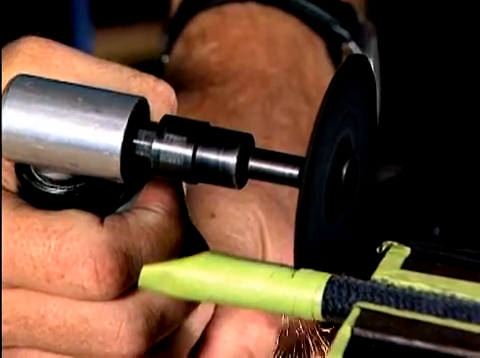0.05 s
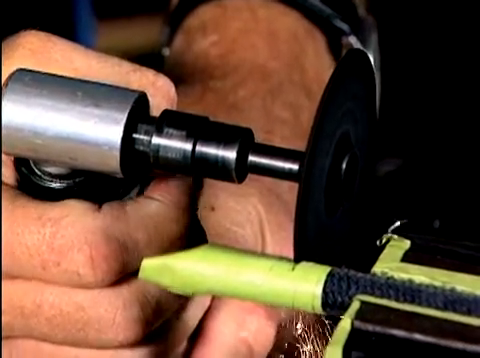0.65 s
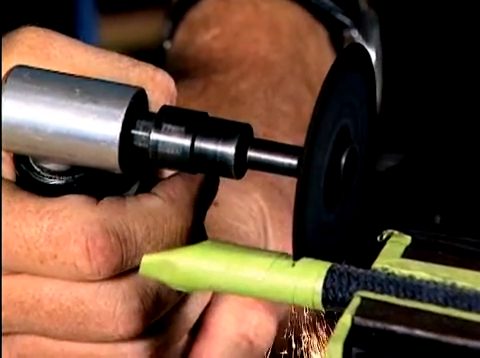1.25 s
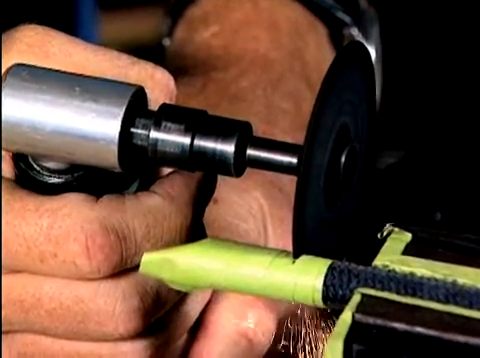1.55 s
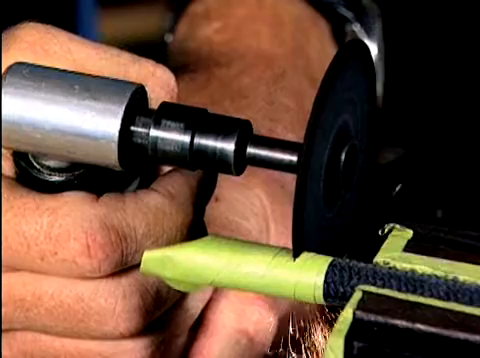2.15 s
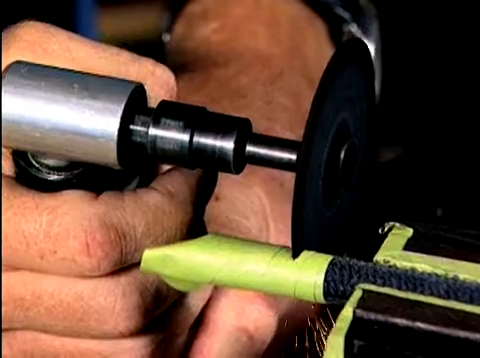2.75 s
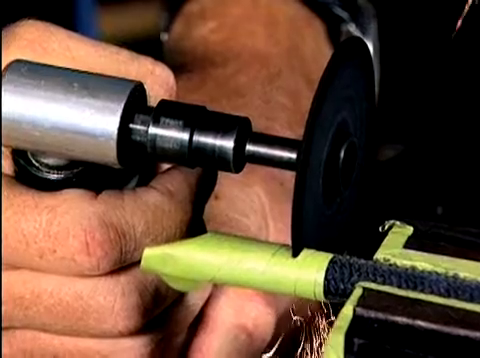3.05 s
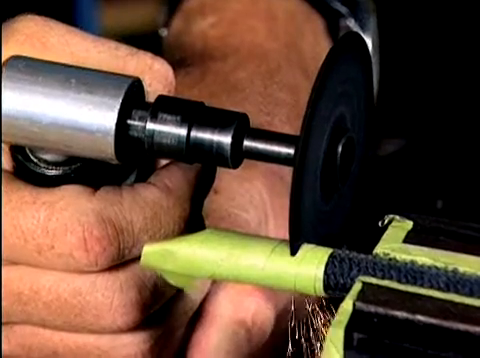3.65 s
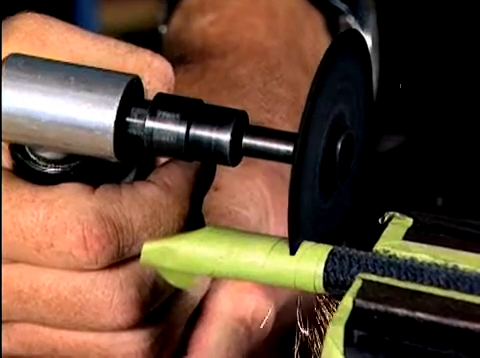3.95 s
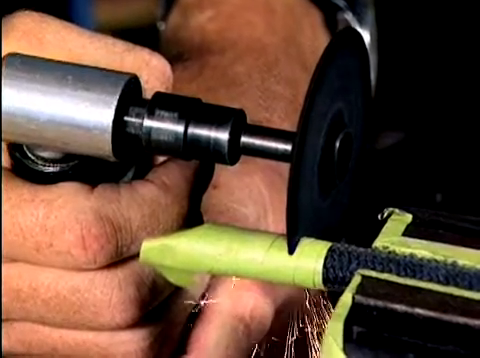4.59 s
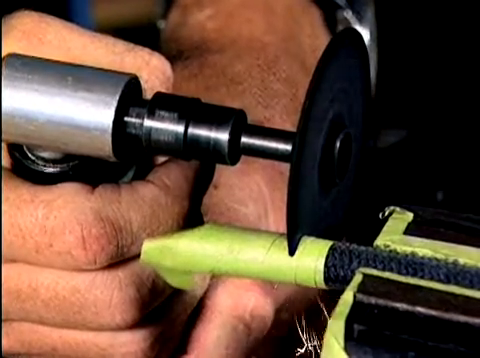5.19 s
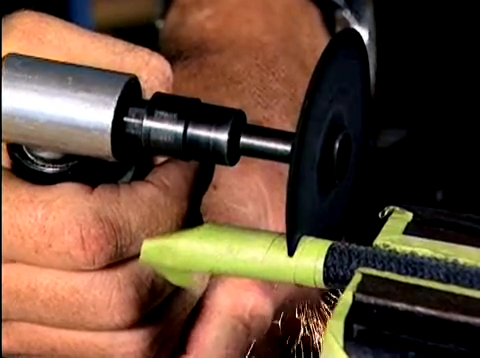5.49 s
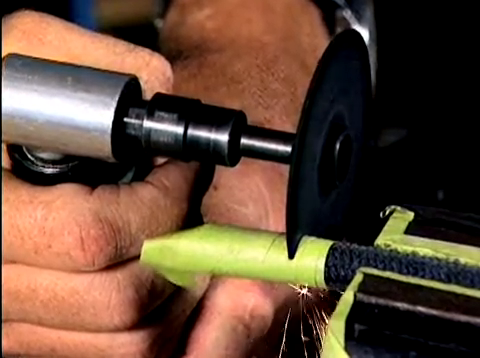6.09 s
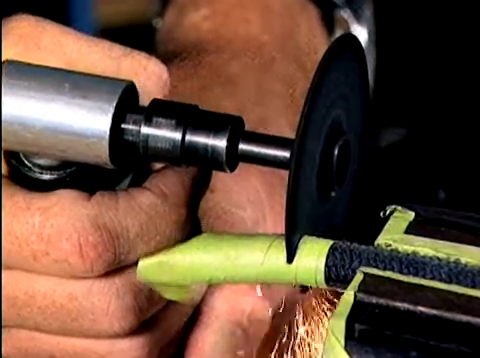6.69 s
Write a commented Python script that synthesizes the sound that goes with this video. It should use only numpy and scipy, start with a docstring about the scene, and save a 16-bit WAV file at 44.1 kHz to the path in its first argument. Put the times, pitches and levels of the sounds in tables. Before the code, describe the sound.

Gritty, continuous grinding and shrill metallic squealing come from an abrasive wheel cutting through a wire-braided hose. Now and then the wheel catches, chatters or rings out briefly. The air motor's whine starts high, sags unevenly under load and rises again in the last second, over a steady exhaust hiss. The tool is heard close up, with a faint, short workshop echo.

```python
"""An air die grinder cuts a steel-braided hose with a thin abrasive wheel, heard close up in mono.
The gritty rim scrapes the same slowly wearing pattern on every turn and sets the wheel squealing at a
few of its natural pitches, in a deep cut as rising chirps. Now and then the wheel catches on the braid,
chatters in the cut or rings out. Behind it, the motor's five vanes puff out a whine that sags in pitch
as the wheel bites, and the exhaust hisses."""
import sys
import numpy as np
from scipy import signal
from scipy.fft import rfft, irfft, next_fast_len
from scipy.io import wavfile
from scipy.ndimage import uniform_filter1d, map_coordinates

SR = 44100
rng = np.random.default_rng(int(sys.argv[2]) if len(sys.argv) > 2 else 0)


def store_pcm(level_fs):
    """Save levels as 16-bit WAV."""
    pcm = np.round(np.clip(level_fs, -1, 1) * 32767).astype(np.int16)
    wavfile.write(sys.argv[1], SR, np.atleast_2d(pcm).T)


N = 301203
TIME = np.arange(N) / SR

# The shaft slows as the wheel bites. Each row: time in seconds, turns per second.
SHAFT_SPEED = [(0.0, 157.5), (0.06, 156.8), (0.12, 154.1), (0.3, 152.7), (0.36, 150.9), (0.46, 152.4),
               (0.62, 159.8), (0.68, 159.7), (0.84, 162.4), (1.16, 159.7), (1.26, 160.5), (1.38, 153.6),
               (1.44, 152.2), (1.5, 148.0), (1.56, 147.4), (1.62, 142.0), (1.68, 141.0), (1.74, 137.1),
               (1.86, 136.2), (1.9, 137.6), (1.96, 135.7), (2.02, 136.0), (2.12, 133.3), (2.22, 125.3),
               (2.28, 123.6), (2.54, 124.3), (2.74, 123.5), (2.8, 124.9), (2.88, 122.0), (2.94, 120.8),
               (2.96, 121.7), (3.08, 132.5), (3.18, 135.9), (3.32, 135.1), (3.48, 133.0), (3.52, 128.9),
               (3.64, 120.9), (3.74, 118.2), (3.82, 118.8), (3.98, 111.6), (4.18, 107.0), (4.36, 107.6),
               (4.44, 110.5), (4.56, 111.1), (4.66, 107.5), (4.78, 106.9), (5.08, 99.3), (5.16, 101.8),
               (5.28, 102.3), (5.38, 104.7), (5.44, 108.7), (5.52, 111.9), (5.64, 112.7), (5.86, 104.0),
               (5.92, 103.6), (6.1, 113.1), (6.16, 114.8), (6.42, 126.0), (6.54, 142.6), (6.6, 145.4),
               (6.64, 144.8), (6.68, 146.6), (6.74, 153.2), (6.82, 159.1)]
# How unevenly the wheel tears the wires. Each row: time in seconds, amount from 0 to 1.
RAGGEDNESS = [(0, 0.2), (0.55, 0.3), (0.85, 0.26), (1.2, 0.08), (1.6, 0.26), (2.5, 0.44), (3.5, 0.38),
              (4.7, 0.19), (5.1, .45), (5.55, 0.2), (5.68, .5), (5.82, .9), (6.05, 0.45), (6.4, .5),
              (6.55, 0.2), (6.83, 0.2)]
# The wheel catches on the braid or eases off.
# Each row: middle in seconds, half length in seconds, scraping change in dB, motor strain in dB.
BRAID_CATCHES = [(0.248, 0.099, -2, 9), (0.406, 0.098, -2.5, -3), (0.64, 0.055, 1.5, -14),
                 (1.129, 0.24, 2, -4), (1.524, 0.17, 2.5, 6), (1.91, 0.35, 1.4, -4), (3.078, 0.12, 2, 3.5),
                 (3.586, 0.14, 2, -2), (5.1, 0.13, 0.5, 7), (5.32, 0.048, -3, 2), (5.964, 0.13, 0, 4.5),
                 (6.312, 0.076, 2, 0)]
# The tone of the exhaust hiss. Each row: frequency in Hz, boost or cut in dB.
HISS_COLOUR = [(25, -24.5), (60, -18), (130, -13.5), (250, -13), (450, -4.5), (900, -7), (1750, -1),
               (3000, -1), (4200, 3), (6100, 5.5), (7400, -4.5), (8050, 2), (9400, -18)]
# Where the exhaust passage rings. Each row: pitch in Hz, width in Hz, strength in dB.
EXHAUST_RESONANCES = [(1208, 73, 8.5), (1520, 90, 3.5), (2090, 240, 7.5), (3180, 210, 6.5)]
# Tones of the rotor's unequal vanes. Each row: multiple of the shaft speed, relative level in dB.
ROTOR_TONES = [(4, -23.5), (7, -32.5), (8, -27.5), (9, -35.5), (13, -29), (15, -25), (20, -22), (25, -27.5)]
# The unbalanced wheel's shake. Each row: multiple of the shaft speed, level at top speed in dB.
SHAKE_TONES = [(1, -57), (2, -56.5)]
# The whine grows as the motor labours. Each row: time in seconds, level in dB.
WHINE_LOUDNESS = [(0.0, -31.5), (0.07, -34.5), (0.12, -29), (0.22, -28), (0.28, -30), (0.5, -30),
                  (0.57, -31.5), (0.76, -32), (1.07, -28), (1.2, -32), (1.27, -30.5), (1.39, -25),
                  (1.46, -24.5), (1.66, -29), (2.1, -29), (2.18, -26.5), (2.26, -28.5), (2.92, -29),
                  (3.05, -27), (3.2, -31), (3.29, -27.5), (3.95, -27.5), (4.15, -29.5), (4.72, -29.5),
                  (4.88, -26), (5.14, -23.5), (5.3, -26.5), (5.76, -29), (5.87, -25.5), (6.1, -29.5),
                  (6.2, -26), (6.35, -32), (6.43, -26.5), (6.53, -34), (6.7, -31.5), (6.83, -33)]
# Brief dips in the whine. Each row: middle in seconds, half length in seconds, change in dB.
WHINE_DROPS = [(.165, 0.013, -5), (.385, .025, -3), (.59, 0.016, -7), (.68, 0.014, -5), (.965, .018, -8),
               (1.155, 0.0081, -5), (1.24, .012, -5), (1.345, 0.0091, -9), (1.5, 0.0093, -15),
               (1.59, .01, -3), (1.66, 0.0087, -7.5), (1.73, .012, -5), (2.0, .012, -8), (2.98, .012, -6),
               (3.63, .01, -3), (6.75, 0.0075, -4)]
# Spells of chatter. Each row: middle in seconds, half length in seconds, level in dB.
CHATTER_SPELLS = [(0.253, 0.086, -18.5), (0.452, 0.16, -22.5), (1.096, 0.24, -28), (2.498, 0.48, -32),
                  (6.602, 0.13, -23)]
# The wheel rings out. Each row: middle in seconds, half length in seconds, rough pitch in Hz, level in dB.
RING_OUTS = [(0.06, 0.16, 6370, -27), (0.254, 0.08, 4740, -27), (0.732, 0.06, 4350, -23),
             (0.88, 0.18, 6310, -28.5), (1.88, .25, 3410, -30), (1.9, 0.27, 4370, -25),
             (2.534, 0.34, 3355, -35), (2.55, 0.27, 4350, -26), (3.25, 0.22, 5800, -28),
             (3.58, 0.07, 4150, -28), (3.8, .14, 4260, -31.5), (4.17, 0.19, 3330, -34),
             (5.048, 0.17, 3400, -34), (5.14, 0.15, 4120, -29), (5.6, .14, 5950, -28),
             (6.32, 0.078, 3440, -29), (6.602, 0.19, 4770, -30), (6.61, 0.12, 5950, -24)]
# The highest squeal. Each row: time in seconds, relative level in dB.
TOP_SQUEAL_LOUDNESS = [(0.0, -22), (0.05, -18.5), (0.3, -24), (0.63, -22.5), (0.7, -31), (0.84, -23.5),
                       (1.12, -25), (1.41, -20), (1.52, -28.5), (1.73, -19), (2.91, -22), (3.23, -21),
                       (3.37, -17.5), (3.67, -25), (3.8, -18.5), (3.9, -21.5), (4.19, -17), (4.57, -19),
                       (4.75, -15.5), (4.87, -26.5), (5.08, -21), (5.12, -28), (5.44, -19), (5.48, -22.5),
                       (5.86, -21.5), (5.91, -24.5), (6.2, -17.5), (6.39, -24), (6.66, -19), (6.7, -26),
                       (6.73, -22), (6.83, -24)]
# The middle squeal shifts with the wheel's grip.
# Each row: time in seconds, relative level in dB, centre pitch in Hz.
MIDDLE_SQUEAL_PATH = [(0.0, -18, 5330), (0.09, -19, 5360), (0.38, -16, 5434), (0.66, -15, 5340),
                      (0.76, -18.5, 5420), (0.84, -17, 5280), (1.18, -17.5, 5250), (1.61, -22, 5417),
                      (2.45, -18.5, 5283), (2.66, -20, 5310), (2.95, -17.5, 5310), (3.04, -19, 5460),
                      (3.25, -21, 5520), (3.54, -21, 5320), (3.76, -17, 5570), (4.03, -21, 5310),
                      (4.57, -18.5, 5390), (4.64, -21, 5420), (4.87, -20.5, 5400), (5.12, -23.5, 5420),
                      (5.21, -17.5, 5380), (5.38, -20, 5480), (5.55, -17.5, 5470), (5.91, -20, 5480),
                      (6.05, -17, 5440), (6.14, -19, 5420), (6.43, -20, 5420), (6.58, -19, 5400),
                      (6.66, -22.5, 5360), (6.77, -17, 5440), (6.83, -19.5, 5370)]
# How much of the middle squeal is chirps. Each row: time in seconds, share of its power from 0 to 1.
CHIRP_SHARE = [(0, .2), (1.2, .05), (1.4, .65), (2.1, .45), (2.3, .15), (2.75, .2), (3.1, .7), (3.7, .7),
               (3.9, .95), (4.1, .9), (4.25, .3), (4.45, .95), (6.4, .9), (6.6, .5), (6.83, .5)]
# Where the scraped wheel rings. Each row: pitch in Hz, width in Hz, relative strength in dB.
WHEEL_RESONANCES = [(2223, 62, -6.5), (2774, 410, -2.5), (3390, 450, -5.5), (4180, 870, -5),
                    (4760, 280, -2), (6670, 180, 3), (8630, 280, 0.5), (9050, 88, -2)]
# The broad tone of the scraping. Each row: frequency in Hz, boost or cut in dB.
SCRAPE_COLOUR = [(100, -24.5), (500, -23.5), (1200, -7), (1750, -13.5), (2600, -13), (4000, 1.5),
                 (5600, -3), (6100, -3.5), (7100, 1.5), (7550, -5.5), (8050, -9.5), (9400, -22.5)]

VANES = 5


def undb(db):
    """Turn decibels into a number to multiply a sound by."""
    return 10 ** (np.asarray(db) / 20)


def curves(table):
    """Join the rows of a table with straight lines in time, one curve for each value column."""
    times, *columns = np.transpose(table)
    return [np.interp(TIME, times, column) for column in columns]


def bell(middle_s, half_s):
    """A smooth swell from 0 up to 1 and back."""
    return np.exp(-((TIME - middle_s) / half_s) ** 2)


def unit(x):
    """Scale a signal so that its typical size is 1."""
    return x / np.std(x)


def even(x):
    """Hold the loudness steady, but keep the pulsing within each turn."""
    return x / np.sqrt(uniform_filter1d(x ** 2, size=2600) + 1e-12)


def drift(rate):
    """A smooth random curve of typical size 1, with about `rate` new values a second."""
    coarse = TIME[::16]
    values = map_coordinates(rng.standard_normal(4096), [coarse * rate], order=2, mode="wrap")
    return np.interp(TIME, coarse, unit(values))


def colour(x, points):
    """Boost or cut a sound's frequencies along a table of Hz and dB."""
    hz, db = np.transpose(points)
    size = next_fast_len(N)
    bins_hz = np.maximum(np.fft.rfftfreq(size, 1 / SR), 1)
    gain = undb(np.interp(np.log(bins_hz), np.log(hz), db))
    return irfft(rfft(x, size) * gain, size)[:N]


def ring(x, hz, width):
    """A resonance: let through a band `width` Hz wide around one pitch."""
    return signal.lfilter(*signal.iirpeak(hz, hz / width, fs=SR), x)


def shaft_tones(turns, table, waver_db):
    """Pure tones that follow the shaft, each wavering a little in level."""
    tones = np.zeros(N)
    for multiple, db in table:
        level = undb(db + waver_db * drift(5))
        tones += level * np.sin(2 * np.pi * (multiple * turns + rng.random()))
    return np.sqrt(2) * tones


def catches(lead_s):
    """Each catch swells and lets go. Gives two curves in dB: scraping change and motor strain."""
    return sum(np.outer(changes_db, bell(s - lead_s, half_s)) for s, half_s, *changes_db in BRAID_CATCHES)


def rim_grit(turns, life_turns, fresh, grains=256):
    """The same grit comes round on each turn and slowly wears; `fresh` adds grit that breaks at once."""
    keep = np.exp(-1 / life_turns)
    grit = rng.standard_normal((1100, grains))  # one row for each turn
    worn, _ = signal.lfilter([np.sqrt(1 - keep ** 2)], [1, -keep], grit, axis=0, zi=keep * grit[-1:])
    track = map_coordinates(worn.ravel(), [turns * grains], order=3, mode="wrap")
    return unit(track) + fresh * rng.standard_normal(N)


def high_spot(turns, depth_db, wander):
    """The wheel wobbles slightly and presses hardest once a turn, at a spot that creeps round."""
    return undb(depth_db * np.cos(2 * np.pi * (turns + wander * drift(2.53))))


def room_echo(sound, fade_s=0.09):
    """The bench and walls send back a short, dense echo."""
    delay_s = TIME[:SR // 2]
    tail = rng.standard_normal(len(delay_s)) * undb(-60 * delay_s / fade_s) * (delay_s > 0.004)
    return undb(-13.5) * signal.fftconvolve(sound, tail / np.linalg.norm(tail))[:N]


def exhaust_hiss(turns):
    """Escaping air hisses and swells with every puff from a vane."""
    puffs = undb(1.8 * np.cos(2 * np.pi * VANES * turns) + 0.5 * drift(9.9))
    return undb(-27.5) * unit(colour(rng.standard_normal(N) * puffs, HISS_COLOUR))


def vane_whine(vane_tone, speed_hz, strain_db):
    """The vanes' puffs make a whine that flutters more as the speed slides or the wheel catches."""
    (whine_db,) = curves(WHINE_LOUDNESS)
    dips_db = sum(db * bell(s, half_s) for s, half_s, db in WHINE_DROPS)
    tremble_db = 0.97 * unit(ring(ring(rng.standard_normal(N), hz=16, width=31), hz=16, width=31))
    slide_hz_per_s = np.abs(uniform_filter1d(np.gradient(speed_hz) * SR, size=6000))
    depth = 0.071 + 0.1 * np.tanh(slide_hz_per_s / 55) + 0.0049 * strain_db
    flutter = 1 + depth * (drift(36) + 1j * drift(40))  # shakes both level and pitch
    return np.sqrt(2) * undb(whine_db + dips_db + tremble_db) * (flutter * vane_tone).imag


def motor(turns, speed_hz):
    """The whine, weaker tones that ring in the exhaust passage, and the unbalanced wheel's shake."""
    _, strain_db = catches(lead_s=0.082)  # the motor feels a catch early
    vane_tone = np.exp(2j * np.pi * VANES * turns)
    whine = vane_whine(vane_tone, speed_hz, strain_db)
    octave_db = -52.5 + 0.94 * strain_db + drift(25)
    flutter = 1 + 0.27 * (drift(70) + 1j * drift(70))
    octave = np.sqrt(2) * undb(octave_db) * (flutter * vane_tone ** 2).imag
    housing = undb(12.7) * ring(octave, hz=1068, width=79)  # rings as the octave sinks to this pitch
    rotor = shaft_tones(turns, ROTOR_TONES, waver_db=1.5) * undb(-28.5 + 0.42 * strain_db + 3.2 * drift(60))
    tones = octave + housing + rotor
    passage = sum(undb(db) * ring(tones, hz, width) for hz, width, db in EXHAUST_RESONANCES)
    shake = shaft_tones(turns, SHAKE_TONES, waver_db=0.5) * (speed_hz / speed_hz.max()) ** 2
    return whine + tones + passage + shake


def chatter(turns, speed_hz, ping_hz=5210, half_s=0.00043, lead_turns=0.0986):
    """In spells the rim slaps the side of the cut once a turn, each slap a very short ping."""
    from_slap_s = ((turns + lead_turns + 0.5) % 1 - 0.5) / speed_hz
    slaps = np.exp(-(from_slap_s / half_s) ** 2) * np.cos(2 * np.pi * ping_hz * from_slap_s)
    spells = sum(undb(db) * bell(s, spell_half_s) for s, spell_half_s, db in CHATTER_SPELLS)
    return unit(slaps * undb(0.88 * drift(90))) * spells


def ring_outs(turns, speed_hz):
    """A pitch of the wheel locks to the nearest multiple of the shaft speed, swells and dies away."""
    ringing = np.zeros(N)
    for s, half_s, hz, db in RING_OUTS:
        multiple = np.round(hz / np.interp(s, TIME, speed_hz))
        tremble = 1 + 0.17 * (drift(90) + 1j * drift(90))
        tone = tremble * np.exp(2j * np.pi * (multiple * turns + rng.random()))
        ringing += unit(tone.imag) * undb(db) * bell(s, half_s)
    pulse = high_spot(turns, depth_db=4, wander=0.1)
    return ringing * pulse / np.sqrt(np.mean(pulse ** 2))


def squeal(force, hz, width, grip):
    """Rubbing drives one natural pitch of the wheel; slipping limits how far it swings."""
    tone = np.exp(2j * np.pi * np.cumsum(hz * np.ones(N)) / SR)
    keep = np.exp(-np.pi * width / SR)
    swing = signal.lfilter([1], [1, -2 * keep, keep ** 2], force / tone)
    power = np.abs(swing) ** 2
    slipping = np.sqrt(1 + grip * power / uniform_filter1d(power, size=2600))
    return even((swing * tone).real / slipping)


def scream(turns, speed_hz, hz, ragged):
    """The high spot restarts a squeal on every turn and bends its pitch, which makes it buzz."""
    bend_hz = (232 + 970 * ragged) * (1 + 0.1 * drift(3.1))
    part = turns % 1
    cycles = (hz + bend_hz * (part - 1) / 2) * part / speed_hz + 0.082 * ragged * drift(220)
    swell = np.sqrt(np.abs(np.sin(np.pi * part)))
    return unit(swell * np.sin(2 * np.pi * cycles))


def chirps(turns, speed_hz, hz, ragged, half_s=0.0018, rise_hz_per_s=220000):
    """One spot on the rim grabs once a turn and chirps upward; a ragged cut knocks it out of step."""
    turn = np.round(turns)
    level_db, shift, slip = rng.standard_normal((1100, 3))[turn.astype(int) % 1100].T
    age_s = (turns - turn) / speed_hz
    late_s = 0.00045 * ragged * shift
    swell = np.cos(np.pi * (turns - turn)) / (1 + ((age_s - late_s) / half_s) ** 2)
    cycles = hz * age_s + rise_hz_per_s * age_s ** 2 / 2 + 0.25 * np.abs(ragged) ** 1.5 * slip
    return unit(undb(level_db) * swell * np.sin(2 * np.pi * cycles))


def middle_squeal(turns, speed_hz, hz, ragged):
    """As the wheel bites, a buzzing scream breaks up into a strong and a weak chirp on every turn."""
    (share,) = curves(CHIRP_SHARE)
    buzz = scream(turns, speed_hz, hz, ragged)
    strong = chirps(turns, speed_hz, hz, ragged)
    weak = undb(-6.5) * chirps(turns - 0.48, speed_hz, hz, ragged)  # about half a turn later
    return even(np.sqrt(1 - share) * buzz + np.sqrt(share) * unit(strong + weak))


def scraping(turns, ragged):
    """Grit tears through the wire braid and makes the wheel ring."""
    grit = rim_grit(turns, life_turns=28.4, fresh=0.67 + ragged)
    force = grit * high_spot(turns, depth_db=1, wander=0.12) * undb(0.56 * drift(400))
    ringing = sum(undb(db) * ring(force, hz, width) for hz, width, db in WHEEL_RESONANCES)
    return even(unit(colour(force, SCRAPE_COLOUR)) + undb(-0.5) * unit(ringing))


def cutting_wheel(turns, speed_hz):
    """The wheel in the cut: it scrapes, rings out, chatters and squeals at four pitches."""
    (ragged,), (top_db,) = curves(RAGGEDNESS), curves(TOP_SQUEAL_LOUDNESS)
    middle_db, middle_hz = curves(MIDDLE_SQUEAL_PATH)
    load = 1 - speed_hz / speed_hz.max()  # 0 at top speed, 1 if the shaft stopped
    rubbing = rim_grit(turns, life_turns=43, fresh=ragged)
    pulsing = rim_grit(turns, life_turns=150, fresh=ragged) * high_spot(turns, depth_db=7, wander=0.071)
    catch_db, _ = catches(lead_s=0)
    tearing = ragged + 0.13 * catch_db  # a catch tears the wires unevenly
    # The rim skips over the wires and scrapes less while the middle squeal is strong.
    skip_db = 0.25 * (middle_db - middle_db.mean())
    scrape_db = -22 + 2.5 * (load - load.mean()) + catch_db - skip_db + 0.29 * drift(12)
    low_db = -28 - 0.2 * np.abs(speed_hz - 123.3) + drift(8)  # loudest at 123.3 turns a second
    scrape = scraping(turns, tearing) * undb(scrape_db)
    bursts = ring_outs(turns, speed_hz) + chatter(turns, speed_hz)
    low = squeal(rubbing, hz=4310 + 25 * drift(2.98), width=210, grip=0.1) * undb(low_db)
    middle = middle_squeal(turns, speed_hz, middle_hz, tearing) * undb(middle_db - 0.82 + 0.14 * drift(15))
    upper = squeal(rubbing, hz=5800, width=61, grip=0.3) * undb(-30 - 25 * load)
    top = squeal(pulsing, hz=7085, width=270, grip=0.76) * undb(top_db - 0.53 + 0.5 * drift(14))
    return scrape + bursts + low + middle + upper + top


def scene():
    """Wheel, motor and hiss all follow one slightly uneven shaft; the room echoes the wheel."""
    (speed_hz,) = curves(SHAFT_SPEED)
    turns = np.cumsum(speed_hz * (1 + 0.0012 * drift(18))) / SR
    wheel = cutting_wheel(turns, speed_hz)
    mono = wheel + room_echo(wheel) + motor(turns, speed_hz) + exhaust_hiss(turns)
    return np.array([mono, mono])


def record(dry):
    """A nearby reflection weakens one narrow band; the camera rounds the peaks and cuts the top treble."""
    hollow = dry - 0.39 * ring(dry, hz=1920, width=64)
    rounded = np.tanh(0.74 * hollow) / 0.67
    treble_cut = signal.ellip(10, 0.1, 60, 9750, fs=SR, output="sos")
    return signal.sosfiltfilt(treble_cut, rounded)


dry = scene()
out = record(dry)
store_pcm(out)
```